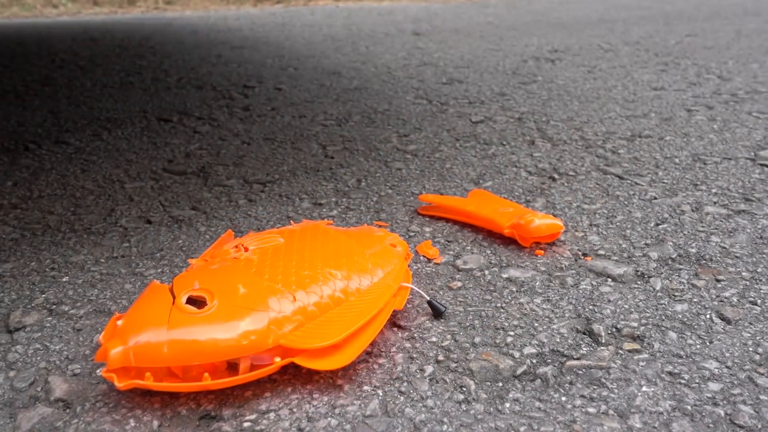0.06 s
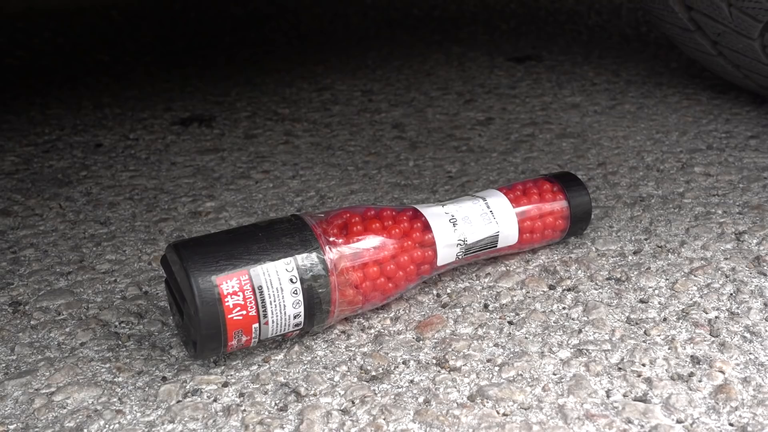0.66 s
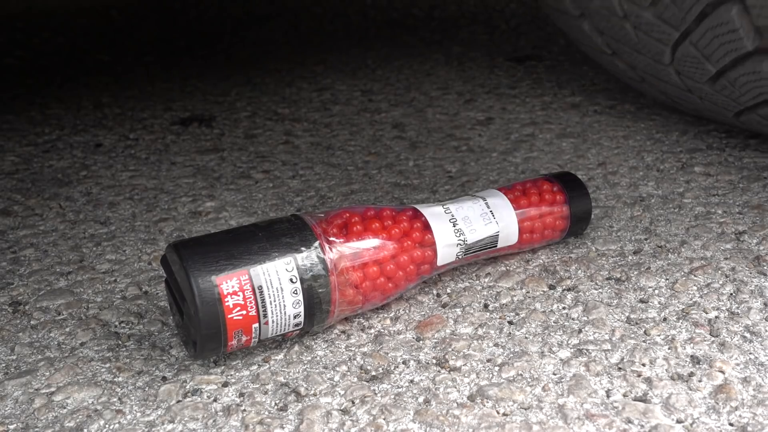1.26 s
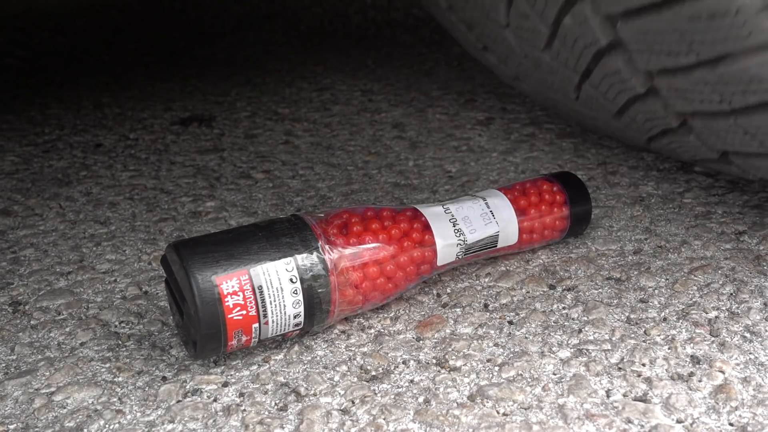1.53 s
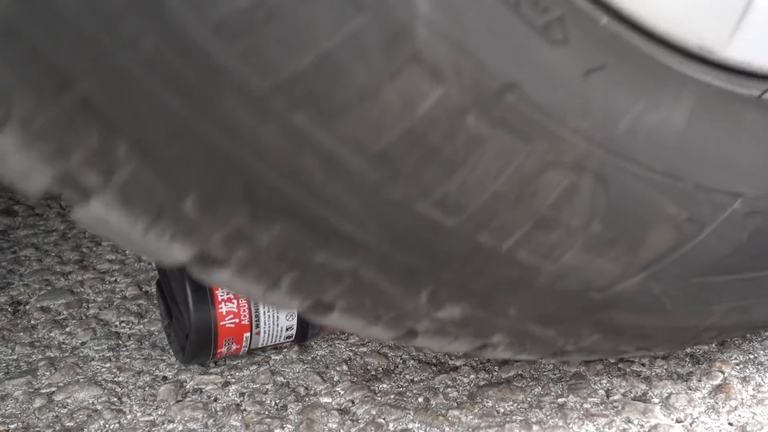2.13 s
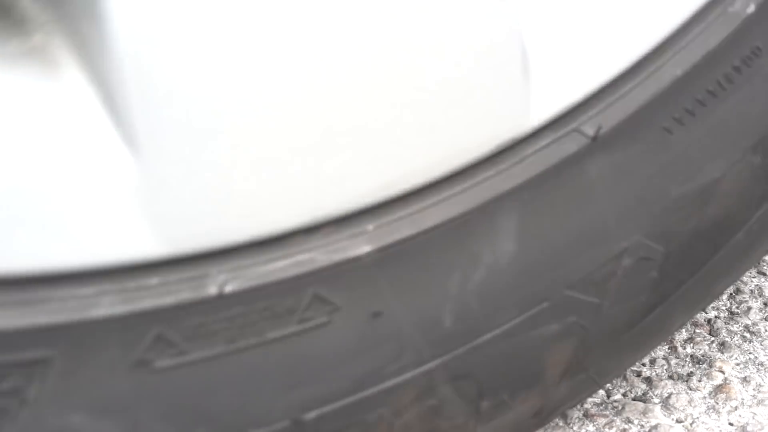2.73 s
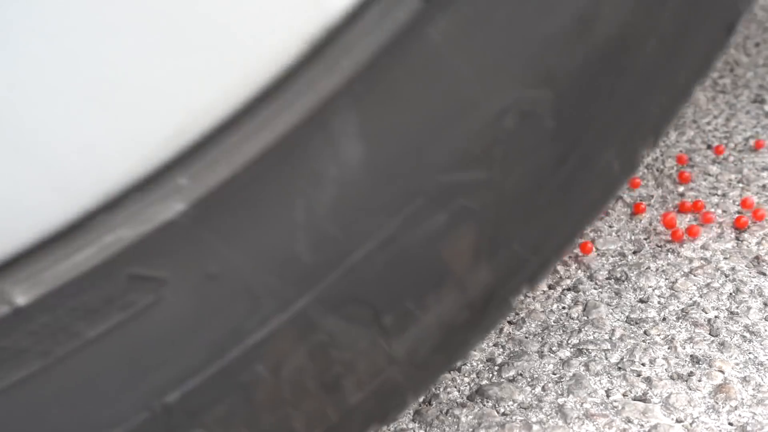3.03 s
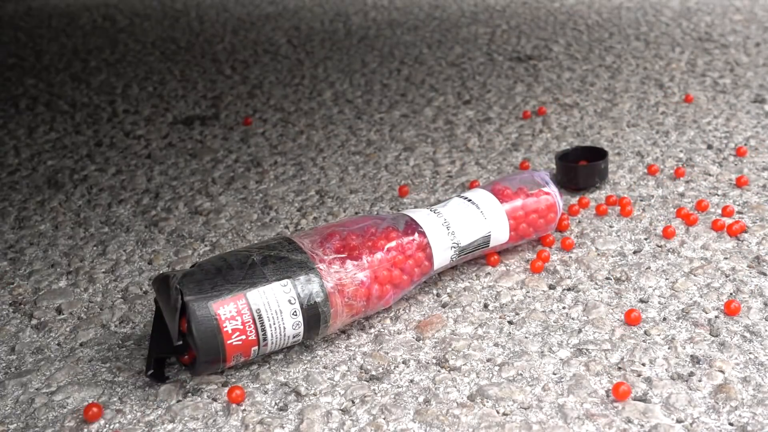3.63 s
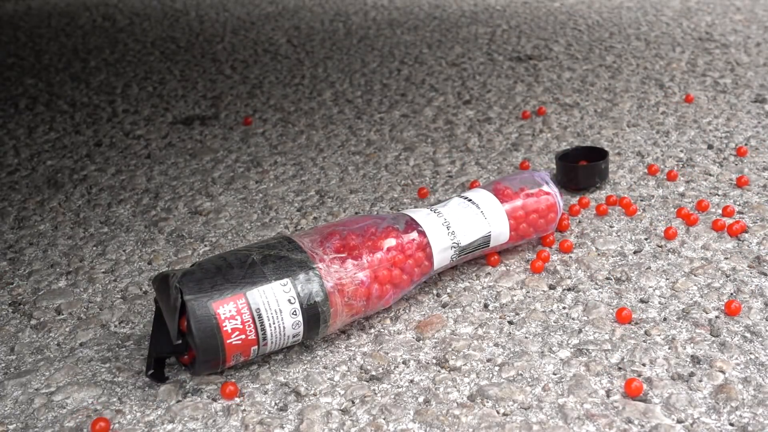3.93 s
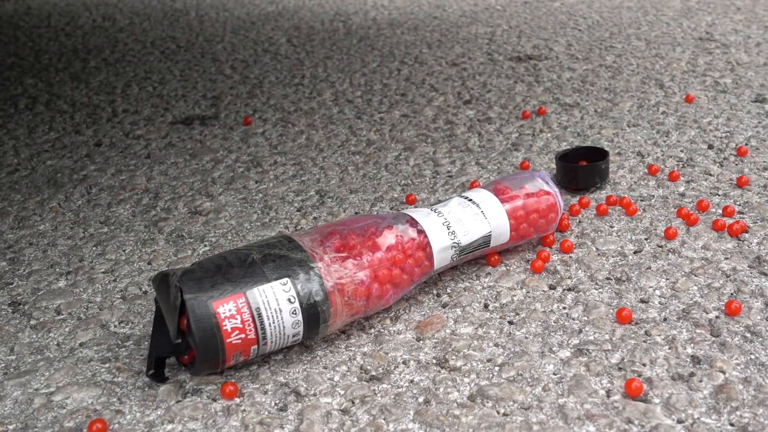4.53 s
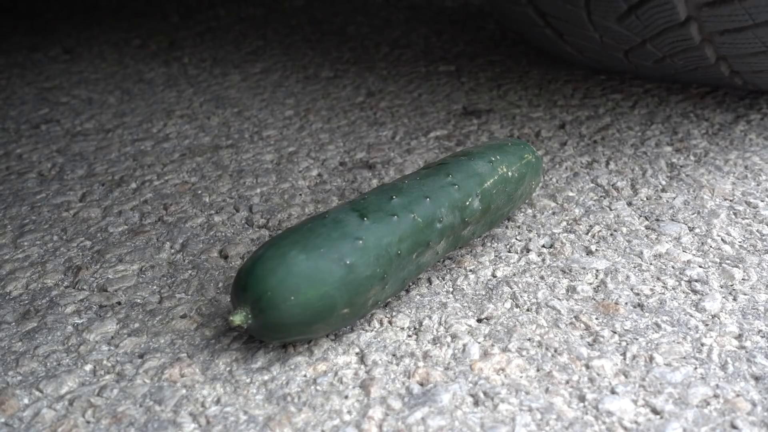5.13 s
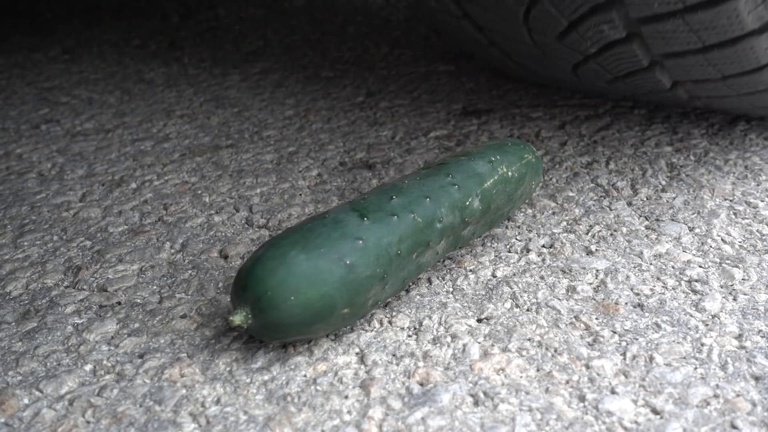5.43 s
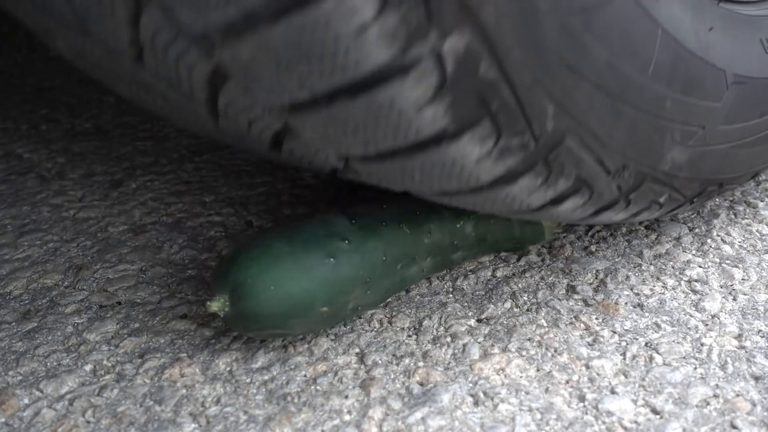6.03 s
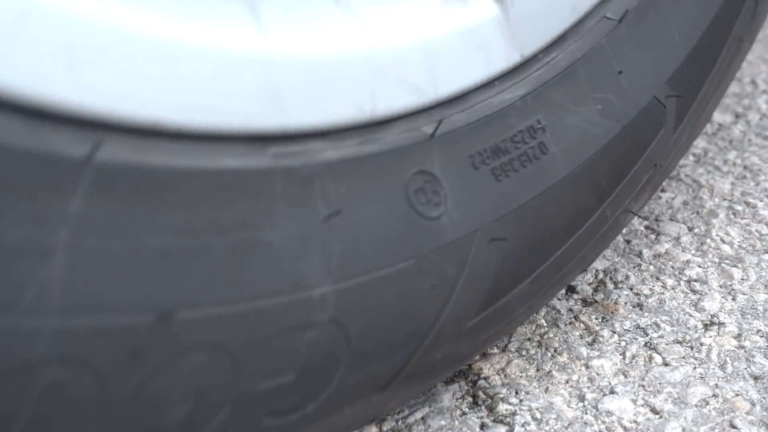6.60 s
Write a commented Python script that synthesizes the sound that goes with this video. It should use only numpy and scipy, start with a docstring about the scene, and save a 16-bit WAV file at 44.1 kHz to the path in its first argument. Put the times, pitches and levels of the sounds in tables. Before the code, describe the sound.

A car creeps over asphalt with a faint low murmur. Its tyre bursts a plastic bottle full of beads in a dense run of sharp cracks, crunches and dull thuds. The cap pops off, a few beads tick and the tyre hums briefly. After a lull with light scuffs, the tyre crushes a cucumber with duller snaps and small spurts of juice. Everything is heard close up, outdoors.

```python
"""A creeping car tyre bursts a plastic bottle full of beads, then crushes a cucumber, close up.
Each fracture snaps and knocks against the rubber over a dense crunch of tiny breaks; beads pour out,
the shell pops and juice spurts. Heavy drops ring the air in the tyre, which hums on afterwards.
Grit ticks and the tread scuffs on the asphalt over the car's low murmur, and the underside of the
car throws the breaks and contacts back as a short echo."""
import sys
import numpy as np
from scipy import signal
from scipy.fft import rfft, irfft
from scipy.io import wavfile
from scipy.ndimage import map_coordinates

SR = 44100
rng = np.random.default_rng(int(sys.argv[2]) if len(sys.argv) > 2 else 0)


def transcribe(signal):
    """Save signal, clipped to [-1, 1], as a 16-bit WAV file at the path in sys.argv[1]."""
    frames = np.atleast_2d(signal).T
    limited = np.clip(frames, -1, 1)
    pcm = np.round(limited * 32767).astype(np.int16)
    wavfile.write(sys.argv[1], SR, pcm)


N = 298116

# The featured fractures. Each row: start in seconds, relative snap and knock levels in dB.
FRACTURES = [(1.903, 0.5, -26), (1.912, 1, -2.5), (2.0622, -5, -21), (2.0792, -14, -32), (2.092, -17, -19),
             (2.122, -2, -12.5), (2.1422, -5, -12), (2.156, 3, -34), (2.1741, -1, -9), (2.1917, -2, -16),
             (2.202, -1.5, -11.5), (2.2373, 0, -4), (2.2528, -11, -29), (2.2575, -1, -28),
             (2.3122, -7.5, -27), (2.321, 0.5, -10), (2.3514, -2, -2), (2.3742, -3, -37), (2.391, 0, -1.5),
             (2.416, 11.5, -16), (2.4704, -10, -3.5), (2.498, -14, -3.5), (2.551, -8, -15),
             (2.6182, -0.5, -12), (2.6361, -11, -6), (2.6754, -9, -2), (2.7122, -16, -5), (2.7239, 0, 1),
             (2.7662, -5, -1), (2.8206, 0, -29), (2.837, -8, -14), (2.8947, -5, -9), (2.9102, -5.5, -8.5),
             (2.981, -0.5, -9), (2.9895, -0.5, -29), (3.0047, -23, -2), (3.089, -7, -10),
             (3.1029, -8.5, -9), (3.1439, 0, -7), (3.186, -11.5, -10.5), (5.877, -19, -24),
             (5.8921, -13, -19.5), (5.9362, -3, -22), (5.9493, -9, -5), (5.969, -17, -9), (5.9972, -3, -3),
             (6.0156, -12, -5.5), (6.1386, -1, -4), (6.157, -7, -2), (6.3098, -2, -4), (6.4191, -7, 0),
             (6.426, -4.5, -9), (6.4479, -3, -12), (6.512, -7, -6.5), (6.5291, -6.5, -14),
             (6.5626, -5, -34), (6.5655, -29, -1.5), (6.5835, -4.5, -6), (6.6326, -5, -9), (6.64, 0.5, -35),
             (6.6725, -11, -8), (6.68, -1, -19), (6.705, -9, -10), (6.719, -8.5, -35), (6.7256, -9.5, -13)]
# Snaps dull as the bottle flattens, and in the soft cucumber.
# Each row: time in seconds, snap pitch in Hz, knock pitch in Hz.
FRACTURE_TUNING = [(1.9, 7100, 960), (2.2, 7580, 793), (2.36, 6600, 990), (2.75, 5600, 706),
                   (3.1, 2890, 1170), (5.95, 3840, 934), (6.7, 3350, 950)]
# Lesser fractures while the tread lies on an object.
# Each row: start and end in seconds, relative snap and knock levels in dB.
CRACKLE_SPANS = [(2.048, 2.26, -7.5, -22), (2.529, 2.85, -11, -16.5), (6.083, 6.49, -10, -21)]
# Steady grinding of each object. Each row: time in seconds, relative crunch and splinter levels in dB.
BOTTLE_GRIND = [(1.6, -44.5, -85), (1.76, -56.5, -50.5), (1.89, -36.5, -29.5), (2.29, -54, -56.5),
                (2.58, -35, -31), (2.85, -31.5, -36), (3.07, -41.5, -39), (3.19, -43, -28),
                (3.38, -53, -39.5), (3.72, -56, -55), (4.05, -77, -74)]
CUCUMBER_GRIND = [(5.82, -65, -84), (5.87, -56, -60), (5.92, -34, -28), (6.1, -26.5, -23), (6.43, -28, -26),
                  (6.53, -34.5, -37), (6.745, -38, -47)]
# An object gives way and the tyre drops onto it.
# Each row: start and hold in seconds, relative thud, crunch and splinter levels in dB.
CAVE_INS = [(1.912, 0.047, -25, -18, -23), (1.946, 0.018, -16.5, -28, -13.5),
            (1.99, 0.045, -22, -39, -31.5), (2.033, 0.053, -32, -34, -25.5),
            (2.158, 0.091, -35.5, -28.5, -35), (2.411, .035, -21, -22, -31),
            (2.49, 0.053, -21.5, -21.5, -24), (2.669, 0.12, -36, -23.5, -30), (2.745, 0.076, -26, -19, -24),
            (2.905, 0.031, -35.5, -23, -35), (5.953, 0.076, -25.5, -25.5, -44),
            (6.166, 0.063, -27.5, -31, -55), (6.374, 0.075, -48, -29, -31)]
# Tone of the thud, the crunch and both kinds of splinter. Each row: frequency in Hz, gain in dB.
THUD_EQ = [(20, -9), (45, -14), (90, -2), (130, -1.5), (190, 1), (260, 0), (400, -42)]
CRUNCH_EQ = [(130, -32), (260, -3.5), (400, -1), (600, -4), (900, 0), (1200, -3), (1600, -14),
             (2600, -26.5)]
PLASTIC_EQ = [(900, -22.5), (1700, 2), (2600, 1), (3800, 5.5), (6000, 1.5), (8000, 3), (11000, -2)]
PULP_EQ = [(900, -18), (1700, 1.5), (2600, 1), (3800, -1.5), (6000, -1), (8000, -1), (11000, -6)]
# The wall tears open. Each row: start in seconds, level in dB, 60 dB decay in seconds, low cut in Hz.
WALL_TEARS = [(1.586, -16.5, 0.063, 1150), (1.806, -16, 0.029, 6370), (1.86, -25.5, 0.099, 4100),
              (1.913, -19, 0.13, 700), (2.418, -23.5, 0.2, 1800), (2.494, -17.5, 0.14, 1540),
              (2.819, -20, 0.057, 2480), (3.088, -20.5, 0.12, 900), (3.138, -20, 0.32, 1170),
              (3.263, -14, 0.094, 2070), (6.585, -30, 0.033, 900)]
# The shell buckles. Each row: start in seconds, relative level in dB.
SHELL_BUCKLES = [(1.443, -26.5), (1.5552, -11), (1.643, -12.5), (3.003, -11), (6.584, -30.5)]
# Modes of shell and cap. Each row: pitch in Hz, relative level in dB, 60 dB decay in seconds.
SHELL_MODES = [(1405, -12, 0.066), (1628, 4.5, 0.02), (1770, 1.5, 0.015), (1876, -3.5, 0.022),
               (2450, -5, 0.026), (3020, -2, 0.0073), (4700, -18, 0.011)]
CAP_MODES = [(796, -10.5, 0.046), (866, -10.5, 0.044), (660, -39, 0.073), (1030, -25, .035),
             (2130, -18.5, 0.034)]
# Cucumber juice. Each row: centre in seconds, level in dB, pitch in Hz, half length in seconds.
JUICE_SPURTS = [(6.042, -31, 9100, 0.02), (6.096, -27, 4630, 0.035), (6.248, -22.5, 5700, 0.027),
                (6.381, -21, 1910, 0.0059), (6.383, -29, 9500, 0.043), (6.591, -23, 2030, 0.01),
                (6.666, -34, 2900, 0.015)]
# Drops that ring the tyre air. Each row: start in seconds, relative first and second mode levels in dB.
HEAVY_DROPS = [(1.911, -28.5, -23.5), (2.415, -28, -28), (2.53, -43, -23.5), (2.77, -26, -22.5),
               (2.93, -31, -23.5)]
# Loose beads and grit. Each row: start in seconds, relative level in dB, pitch in Hz.
GRIT_TICKS = [(0.152, -39, 1680), (0.383, -37.5, 1880), (1.066, -23.5, 1310), (1.26, -39, 2860),
              (1.271, -37, 2580), (1.361, -40.5, 4200), (1.766, -27, 2400), (3.425, -27, 4670),
              (3.461, -26, 6500), (3.505, -23.5, 4520), (3.648, -23, 4800), (3.74, -36.5, 4550),
              (4.085, -25, 1150), (4.241, -31.5, 2220), (4.803, -43, 6200), (4.822, -40, 7200),
              (5.11, -38.5, 6060), (5.837, -24, 1490)]
# Dull knocks. Each row: start in seconds, relative level in dB, pitch in Hz, 60 dB decay in seconds.
CAR_BUMPS = [(0.038, -35, 240, 0.087), (0.523, -41, 234, 0.092), (.553, -38.5, 420, 0.068),
             (.966, -35, 133, 0.11), (1.601, -46, 200, .1), (3.451, -41, 172, .11),
             (4.758, -33, 400, 0.053), (4.8, -41, 378, 0.13), (5.111, -45.5, 360, 0.21),
             (5.626, -28.5, 254, 0.042), (5.84, -39, 245, .09)]
# Tread blocks slip on asphalt. Each row: centre in seconds, level in dB, pitch in Hz.
TREAD_SCUFFS = [(.7, -58, 2200), (.875, -53, 710), (4.555, -52, 2660), (4.65, -54, 1680),
                (4.812, -47.5, 1740), (5.125, -52, 1517), (5.235, -51.5, 1710), (5.39, -50, 507),
                (5.445, -48, 1730), (5.675, -48, 1290), (5.72, -53, 2100)]
# Tone of the car's murmur, at first and from then on. Each row: frequency in Hz, gain in dB.
OPENING_MURMUR_EQ = [(15, -41), (25, -8.5), (229, -4.5), (391, -13), (603, -10.5), (840, -18), (954, -14),
                     (1230, -13.5), (1510, -14), (4400, -31.5), (5390, -38.5), (11000, -46.5), (14300, -85),
                     (22000, -120)]
MAIN_MURMUR_EQ = [(15, -35.5), (25, 0), (64, -3), (128, -1), (160, -2.5), (267, -1), (353, -4.5), (518, -5),
                  (907, -8), (1000, -7.5), (1710, -10), (1950, -6.5), (2850, -15), (11000, -28.5),
                  (14300, -69), (22000, -120)]
# Fader ride of the murmur. Each row: time in seconds, level in dB.
MURMUR_LEVEL = [(0, -50.5), (.4, -49), (.56, -43.5), (.585, -59), (1.0, -54), (1.7, -50.5), (3.9, -52.5),
                (4.45, -52), (4.95, -53.5), (5.8, -50)]
# Stereo image of the murmur. Each row: frequency in Hz, left-right likeness from 0 to 1.
MURMUR_LIKENESS = [(60, 1), (170, .93), (500, 0.74), (1400, 0.56), (4000, 0.34), (11000, 0.32)]
# Echo between road and car. Each row: frequency in Hz, 60 dB decay in seconds.
UNDERBODY_DECAY = [(100, 0.087), (900, 0.13), (2500, 0.22), (10000, 0.12)]


def cracks(snap_db, snap_cycles, jerk_db, jerk_s, knock_db, knock_cycles, shatter_db, shatter_t60):
    """Each fracture snaps, runs on in a few weaker jerks, sheds shards and knocks on the rubber."""
    out, shatter = np.zeros((2, 2, N))
    shards = unit(band(grains(9000, spread_db=2, width=0.98), 2200, 11000))
    snap_hz, knock_hz = curves(FRACTURE_TUNING)
    for (s, db, low_db), chance in zip(FRACTURES + lesser_cracks(), rng.standard_normal((256, 5, 3))):
        lag, polarity, _ = chance[0]
        hz = snap_hz[round(s * SR)] * np.exp(0.23 * chance[1, 0])
        low_hz = knock_hz[round(s * SR)] * np.exp(0.1 * chance[1, 1])
        t = stereo_times(lag * 2e-5)[:, :SR // 20]
        snap = amp(db + snap_db) * ring(t, hz, snap_cycles / hz)
        attack = 1 - fade(np.abs(t), 0.0015)
        knock = amp(low_db + knock_db) * ring(t, low_hz, knock_cycles / low_hz) * attack
        add(out, s, np.sign(polarity) * (snap + knock))
        for k, (late, detune, side) in enumerate(chance[2:], 1):
            jerk_hz = np.clip(hz * np.exp(0.37 * detune), 1500, 10000)
            gain = amp(db + jerk_db - 2 * k + 2 * side * np.array([[1], [-1]]))
            add(out, s + jerk_s * (k + .3 * late), gain * ring(t, jerk_hz, snap_cycles / jerk_hz))
        add(shatter, s, amp(db + shatter_db) * fade(t, shatter_t60))
    return out + shatter * shards


def lesser_cracks(per_second=30):
    """Extra fracture rows, loosely timed, that fill each span of crackling."""
    rows = []
    for start, end, snap_db, knock_db in CRACKLE_SPANS:
        times = start + (np.arange(64) + rng.random(64)) / per_second
        scatter_db = rng.standard_normal((64, 2))
        rows += [(s, snap_db + a, knock_db + b) for s, (a, b) in zip(times, scatter_db) if s < end]
    return rows


def crush(grind, splinter_eq, cycles, splinter_trim_db, fizz_db, thud_cut_hz, clump_db, rumble_db):
    """Tiny breaks come in clumps: the tyre carcass thuds, the object crunches, its splinters crackle."""
    crunch_db, splinter_db = curves(grind)
    grinding = amp([crunch_db + rumble_db, crunch_db, splinter_db])
    thud_gain, crunch_gain, splinter_gain = np.hypot(grinding, cave_in_gains())
    t = np.arange(N) / SR
    start, end = grind[0][0], grind[-1][0] + .03
    clumps = amp(clump_db * wobble(130))
    jolts = colour(grains(900, spread_db=2, width=0.23), THUD_EQ)
    thud = amp(2) * thud_gain * unit(band(jolts, thud_cut_hz, 600))
    crunch = crunch_gain * unit(colour(clumps * grains(1800, spread_db=3, width=0.13), CRUNCH_EQ))
    chips = unit(splinters(start, end, cycles)) * np.sqrt((end - start) * SR / N)
    fizz = amp(fizz_db) * rng.standard_normal((2, N))  # breaks too small to tell apart
    crackle = colour(clumps * (chips + fizz), splinter_eq)
    crackle /= np.std(crackle[:, round(start * SR):round(end * SR)])
    return ((t > start) & (t < end)) * (thud + crunch + amp(splinter_trim_db) * splinter_gain * crackle)


def cave_in_gains(attack_s=.012, release_t60=.16):
    """Envelopes for thud, crunch and splinters: each cave-in hits fast, holds and dies away."""
    t = np.arange(N) / SR
    power = np.zeros((3, N))
    for s, hold, *levels_db in CAVE_INS:
        shape = np.clip((t - s) / attack_s, 0, 1) * fade(np.maximum(t - s - hold, 0), release_t60)
        power += (amp(levels_db)[:, None] * shape) ** 2
    for s, _, knock_db in FRACTURES:  # each knock also shakes the carcass, adding thud
        add(power[:1], s, (amp(knock_db - 38) * fade(t[:SR // 4], t60=0.22)) ** 2)
    return np.sqrt(power)


def splinters(start, end, cycles, spread_db=8.5, width=0.192, count=6500):
    """Tiny breaks scattered between two times, each ringing a few cycles at its own pitch."""
    when, pitch = rng.random((2, count, 1))
    size, side, lag = rng.standard_normal((3, count, 1))
    hz = 1000 + 11000 * pitch
    offsets = np.arange(96)
    index = (((start + (end - start) * when) * SR).astype(int) + offsets).ravel()
    strength = amp(spread_db * np.minimum(size, 2)) * np.sqrt(hz)
    channels = []
    for way in (1, -1):
        t = offsets / SR - 5e-5 - way * lag * 2.5e-5
        pings = strength * (1 + way * width * side) * ring(t, hz, cycles / hz)
        channels.append(np.bincount(index, pings.ravel(), N)[:N])
    return np.array(channels)


def tears():
    """A tear is a sudden rush of breaks and bead collisions that dies away."""
    out, t = np.zeros((2, N)), stereo_times(0)
    collisions = grains(9000, spread_db=4, width=.6)
    rattle = colour(collisions, [(1000, 2), (3000, 0), (6000, -3.5), (11000, -8.5)])
    for s, db, t60, low_cut_hz in WALL_TEARS:
        swell = np.zeros((2, N))
        add(swell, s, amp(db) * fade(t, t60) * (1 - fade(t, 0.011)))
        out += swell * unit(band(rattle, low_cut_hz, 11000))
    return out


def plastic_pops(cap_s):
    """The shell buckles with a hollow tick; the cap springs out from under the tread with a lower pop."""
    out, t = np.zeros((2, N)), stereo_times(1e-5)
    attack = 1 - fade(np.abs(t), 0.0036)
    for s, db in SHELL_BUCKLES:
        for hz, mode_db, t60 in SHELL_MODES:
            detune = 1 + 0.012 * rng.standard_normal()
            add(out, s, amp(db + mode_db - 10.5) * ring(t, hz * detune, t60) * attack)
    add(out, cap_s, sum(amp(db) * ring(t, hz, t60) for hz, db, t60 in CAP_MODES))
    return out


def spurts(band_ratio):
    """Juice fizzes through a split in the skin; the size of the split sets the pitch."""
    fizz = grains(4500, spread_db=7, width=0.25)
    return sum(swish(fizz, s, db, hz, half_s, band_ratio) for s, db, hz, half_s in JUICE_SPURTS)


def tyre_air(cavity_hz, waver, release_s, recede_s):
    """Heavy drops ring the air in the tyre: a hum with one wavelength round the ring, and its octave."""
    t = np.arange(N) / SR
    first, second = np.zeros((2, N))
    for s, first_db, second_db in HEAVY_DROPS:
        attack = np.clip((t - s) / 0.03, 0, 1)
        boom = amp(-0.5) * fade(t - s, t60=0.9)
        first = np.hypot(first, amp(first_db) * attack * (boom + fade(t - s, t60=2.65)))
        second = np.hypot(second, amp(second_db) * attack * fade(t - s, t60=0.56))
    load = np.interp(t - release_s, [0, .15], [1, .06])  # the pitch steadies once off the bottle
    phase = 2 * np.pi * cavity_hz * t + waver * load * wobble(21)
    nearness = 1 / (1 + (np.maximum(t - recede_s, 0) / 0.57) ** 2)  # the wheel moves off
    return nearness * (first * np.sin(phase) + second * np.sin(2 * phase))


def ticks(trim_db, grit_t60, bead_t60):
    """Hard beads tick loud and short; the quieter grit scrapes a little longer."""
    out, t = np.zeros((2, N)), stereo_times(0)
    for s, db, hz in GRIT_TICKS:
        chip = rng.standard_normal(t.shape[1]) + .5 * rng.standard_normal(t.shape)
        t60 = np.interp(db, [-36, -26], [grit_t60, bead_t60])
        add(out, s, amp(db + trim_db) * unit(band(chip, hz / 1.9, hz * 1.34)) * fade(t, t60))
    return out


def bumps(trim_db):
    """Dull, soft-edged knocks from around the car."""
    out, t = np.zeros((2, N)), stereo_times(0)
    for s, db, hz, t60 in CAR_BUMPS:
        push = rng.standard_normal(t.shape[1]) + 0.077 * rng.standard_normal(t.shape)
        dull = unit(steep_band(push, hz / 2, hz * 1.45))
        add(out, s, amp(db + trim_db) * dull * fade(t, t60) * (1 - fade(t, 0.0077)))
    return out


def scuffs(band_ratio, half_cycles):
    """Rubber slips briefly over the stones: a rough, narrow rasp that lasts longer the lower it is."""
    slips = grains(2500, spread_db=7.5, width=0.25)
    return sum(swish(slips, s, db, hz, half_cycles / hz, band_ratio) for s, db, hz in TREAD_SCUFFS)


def car_murmur(tone_switch_s):
    """Low bed of the creeping car, a little to the left, with fine grit rustling under the tread."""
    level_db, = curves(MURMUR_LEVEL)
    hz = np.fft.rfftfreq(N, 1 / SR)
    spread = np.arccos(np.clip(along(MURMUR_LIKENESS, hz), 0, 1)) / 2
    mid, side = rfft(rng.standard_normal((2, N))) * [np.cos(spread), np.sin(spread)]
    right_delay = np.exp(-2j * np.pi * hz * 9e-5)
    noise = irfft([mid + side, (mid - side) * right_delay], N)
    opening = np.arange(N) / SR < tone_switch_s
    murmur = np.where(opening, unit(colour(noise, OPENING_MURMUR_EQ)), unit(colour(noise, MAIN_MURMUR_EQ)))
    rustle = unit(steep_band(noise, 1100, 3400) * amp(5 * wobble(60)))
    gain = amp(level_db + 1.1 * wobble(14))
    grit = unit(steep_band(grains(90, spread_db=4, width=.5), 1200, 3000))
    return gain * (murmur + amp(-20.5) * rustle + amp(-15) * grit) * amp([[1], [-1]])


def underbody(x):
    """Scattered echoes between road and car, nearly centred in the bass and wider above."""
    hz, t, noise = signal.stft(rng.standard_normal((3, SR // 4)), SR, nperseg=128)
    width = along([(200, 0.2), (900, 0.89), (2500, 0.31), (6000, 0.88)], hz)[:, None]
    scatter = noise[:2] * width + noise[2] * np.sqrt(1 - width ** 2)
    _, tail = signal.istft(scatter * fade(t, along(UNDERBODY_DECAY, hz)[:, None]), SR, nperseg=128)
    tail = np.pad(tail, ((0, 0), (SR // 500, 0)))  # 2 ms pre-delay
    return signal.fftconvolve(x, tail / np.linalg.norm(tail[0]), axes=1)[:, :N]


def grains(rate, spread_db, width):
    """Random stereo clicks, about rate a second; width sets how unlike the two sides are."""
    chance, size, side = rng.random(N), rng.standard_normal(N), rng.standard_normal(N)
    pulses = (chance < rate / SR) * amp(spread_db * np.clip(size, -2, 2)) * rng.choice([-1, 1], N)
    return unit(pulses * np.array([1 + width * side, 1 - width * side]))


def swish(texture, s, db, hz, half_s, band_ratio):
    """A narrow band of a texture that swells to a peak at time s and fades."""
    swell = np.exp(-((np.arange(N) / SR - s) / half_s) ** 2)
    return amp(db) * swell * unit(band(texture, hz / band_ratio, hz * band_ratio))


def ring(t, hz, t60):
    """One damped mode."""
    return np.sin(2 * np.pi * hz * t) * fade(t, t60)


def fade(t, t60):
    """Decay from t = 0, falling 60 dB in t60 seconds."""
    return (t >= 0) * np.exp(-np.log(1000) * np.abs(t) / t60)


def wobble(rate):
    """A smooth random curve, rate knots a second."""
    return map_coordinates(rng.standard_normal(4096), [np.arange(N) * rate / SR], mode="wrap")


def colour(x, eq, size=4096):
    """Minimum-phase EQ through (Hz, dB) points."""
    cepstrum = irfft(np.log(amp(along(eq, np.fft.rfftfreq(size, 1 / SR)))))
    cepstrum[1:size // 2] *= 2
    cepstrum[size // 2 + 1:] = 0
    return signal.fftconvolve(x, irfft(np.exp(rfft(cepstrum)))[None], axes=1)[:, :N]


def band(x, lo_hz, hi_hz):
    """Gentle band-pass."""
    sos = signal.butter(2, [lo_hz, min(hi_hz, SR / 2 - 1)], "band", fs=SR, output="sos")
    return signal.sosfilt(sos, x)


def steep_band(x, lo_hz, hi_hz):
    """Two band-passes in series."""
    return band(band(x, lo_hz, hi_hz), lo_hz, hi_hz)


def along(points, hz):
    """Read (Hz, value) points on a log frequency axis."""
    knots_hz, values = np.transpose(points)
    return np.interp(np.log(hz + 1), np.log(knots_hz), values)


def curves(rows):
    """An automation curve for each column after the time."""
    times, *columns = np.transpose(rows)
    return [np.interp(np.arange(N) / SR, times, column) for column in columns]


def stereo_times(lag):
    """Time since a hit on the left and right, lag seconds apart."""
    return np.arange(SR // 4) / SR + np.array([[lag], [-lag]]) / 2


def add(track, s, sound):
    """Mix a sound in at time s."""
    part = track[:, round(s * SR):][:, :sound.shape[-1]]
    part += sound[..., :part.shape[-1]]


def amp(db):
    """Decibels to gain."""
    return 10 ** (np.asarray(db) / 20)


def unit(x):
    """Scale to rms 1."""
    return x / np.sqrt(np.mean(x ** 2) + 1e-20)


def scene():
    """A sharp bus and a dense bus, each with its echo, over the tyre's hum and the car's murmur."""
    fractures = cracks(snap_db=3, snap_cycles=5.73, jerk_db=-4, jerk_s=.0008,
                       knock_db=3.5, knock_cycles=5.22, shatter_db=-13, shatter_t60=0.0058)
    sharp = band(fractures + plastic_pops(cap_s=3.2572), 400, SR / 2)  # the snaps, knocks and pops are kept above 400 Hz
    bottle = crush(BOTTLE_GRIND, PLASTIC_EQ, cycles=10, splinter_trim_db=-1, fizz_db=-3,
                   thud_cut_hz=18, clump_db=3.5, rumble_db=-12)
    cucumber = crush(CUCUMBER_GRIND, PULP_EQ, cycles=12, splinter_trim_db=.5, fizz_db=-16,
                     thud_cut_hz=75, clump_db=2.04, rumble_db=-11.5)
    dense = bottle + cucumber + tears() + spurts(band_ratio=1.19)
    dense += ticks(trim_db=-8, grit_t60=0.043, bead_t60=0.019) + bumps(trim_db=3.5)
    dense += scuffs(band_ratio=1.26, half_cycles=25)
    echoes = amp(-8) * underbody(sharp) + amp(-10.5) * underbody(dense)
    hum = tyre_air(cavity_hz=231.9, waver=0.6, release_s=2.96, recede_s=3.44)
    return sharp + dense + echoes + hum + car_murmur(tone_switch_s=.57)


def record(dry):
    """Soft clipping rounds the highest peaks; a steep low-pass takes off the very top."""
    ceiling, top_hz = 0.42, 11150
    rounded = dry / (1 + (dry / ceiling) ** 4) ** (1 / 4)
    hz = np.fft.rfftfreq(N, 1 / SR)
    return irfft(rfft(rounded) / np.sqrt(1 + (hz / top_hz) ** 140), N)


dry = scene()
out = record(dry)
transcribe(out)
```